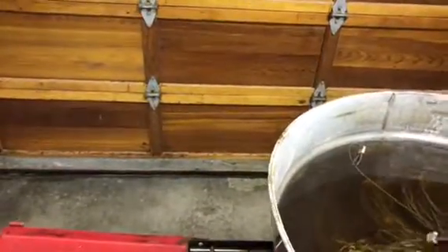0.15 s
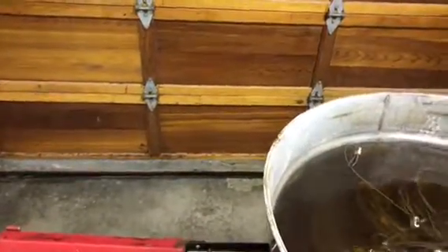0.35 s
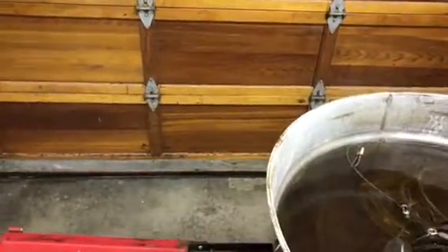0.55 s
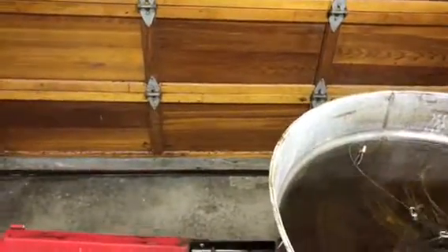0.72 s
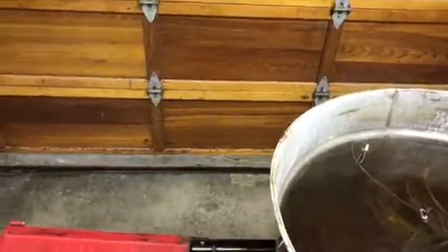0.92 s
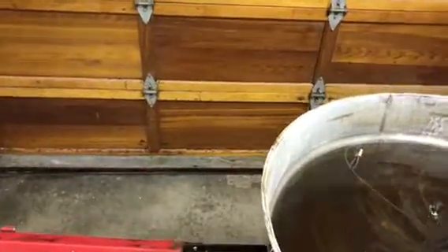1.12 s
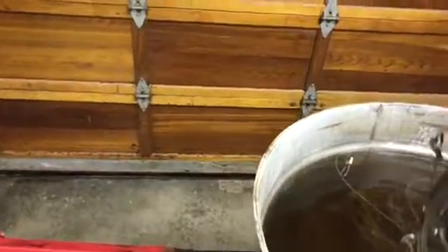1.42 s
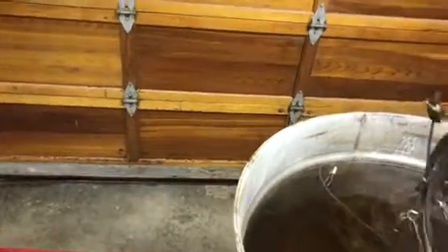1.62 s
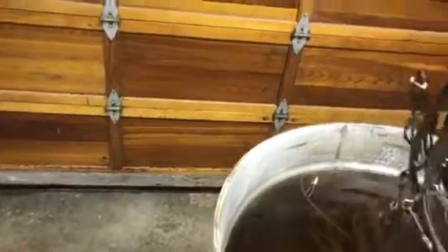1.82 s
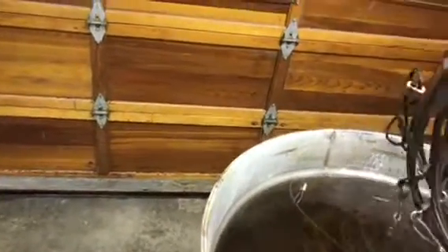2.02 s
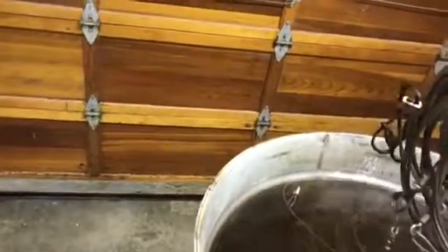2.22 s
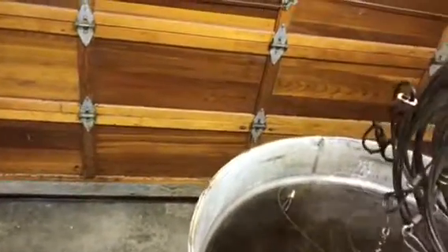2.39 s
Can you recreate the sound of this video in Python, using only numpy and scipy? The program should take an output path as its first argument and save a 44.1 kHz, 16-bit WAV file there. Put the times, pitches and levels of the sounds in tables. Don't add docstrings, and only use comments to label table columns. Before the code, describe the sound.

Wet cable drags against a ringing metal tub, followed by fast dripping, plinks and watery plops

```python
import sys
import numpy as np
from scipy import signal
from scipy.fft import rfft, irfft
from scipy.io import wavfile
from scipy.ndimage import uniform_filter1d

SR = 44100
rng = np.random.default_rng(int(sys.argv[2]) if len(sys.argv) > 2 else 0)


def store_pcm(level_fs):
    pcm = np.round(np.clip(level_fs, -1, 1) * 32767).astype(np.int16)
    wavfile.write(sys.argv[1], SR, np.atleast_2d(pcm).T)


def decibels_to_gain(level_db):
    exponent = np.asarray(level_db, float) / 20
    return 10 ** exponent


N = 112454


def evened(x):
    return x / np.sqrt(np.mean(x ** 2) + 1e-20)


def read(points, hz):
    f, value = np.transpose(points)
    return np.interp(np.log(hz + 1), np.log(f + 1), value)


def add(mix, start_s, sound):
    part = mix[round(start_s * SR):][:len(sound)]
    part += sound[:len(part)]


def colour(x, points):
    hz = np.fft.rfftfreq(len(x), 1 / SR)
    return irfft(rfft(x) * decibels_to_gain(read(points, hz)), len(x))


def resonate(x, hz, width_hz):
    return signal.lfilter(*signal.iirpeak(hz, hz / width_hz, SR), x)


def resonate_twice(x, hz, width_hz):
    return resonate(resonate(x, hz, width_hz), hz, width_hz)


def smooth_noise(size):
    return evened(uniform_filter1d(uniform_filter1d(rng.standard_normal(N), size), size))


def wander(spread_db=5.0, window_s=0.045):
    return decibels_to_gain(spread_db * smooth_noise(round(window_s * SR)))


def clicks(per_s, spread_db):
    when, sign, size = rng.random((3, N))
    return (when < per_s / SR) * np.sign(sign - 0.5) * decibels_to_gain(-spread_db * np.log(size + 1 / 30))


def decay(peak_db, t60_s, t):
    return decibels_to_gain(peak_db - 60 * t / t60_s)


def puff(peak_db, lo_hz, hi_hz, t60_s, noise):
    band = signal.butter(2, [lo_hz, min(hi_hz, 20000)], "band", fs=SR, output="sos")
    fade = decay(peak_db, t60_s, np.arange(len(noise)) / SR)
    return fade * 0.5 * evened(signal.sosfilt(band, noise))


def bubble(peak_db, hz, t60_s, rise_per_s=4.7, neck_rise=0):
    neck_s, onset_s = 0.00075, 0.0004
    t = np.arange(0, 1.2 * t60_s, 1 / SR)
    neck = neck_rise * neck_s * (1 - np.exp(-t / neck_s))
    turns = hz * (t + rise_per_s * t ** 2 / 2 + neck)
    return decay(peak_db, t60_s, t) * np.minimum(t / onset_s, 1) * np.sin(2 * np.pi * turns)


# pitch_hz, level_db (per Hz)
AIR_SPECTRUM = [(76, -56), (130, 7), (501, 0), (780, -0.5), (1240, -23), (1680, -25), (8740, -13.5),
                (16000, -13.5)]


def air():
    return decibels_to_gain(-66) * evened(colour(rng.standard_normal(N), AIR_SPECTRUM))


# pitch_hz, width_hz, level_db
RUMBLES = [(58.3, 10, -71.5), (92.8, 34, -70), (32, 88, -74)]


def rumble():
    out = np.zeros(N)
    for hz, width_hz, level_db in RUMBLES:
        out += decibels_to_gain(level_db) * evened(resonate_twice(rng.standard_normal(N), hz, width_hz))
    return out


# time_s, level_db, brightness_db
DRAGS = [
    [(0, -56, -0.5), (.19, -57, 4), (.25, -44.5, 4), (.34, -42.5, 3.5), (.5, -42, 7), (.6, -45, -4),
     (.67, -51.5, -2), (.76, -58.5, 0), (.92, -72.5, 1)],
    [(1.02, -65.5, -15), (1.034, -50.5, 3.5), (1.09, -57, -4.5), (1.14, -53, 2), (1.2, -50.5, 3.5),
     (1.25, -49.5, -19), (1.31, -45, -11), (1.38, -57, -4), (1.47, -68.5, -12)],
]
# pitch_hz, level_db (per Hz)
WALL_SPECTRUM = [(150, -23), (700, -11.5), (1100, 1), (2100, -2), (3200, -5), (4800, -17), (7000, -20.5),
                 (16000, -25)]
# pitch_hz, width_hz, level_db
TUB_MODES = [(1350, 71, 5.5), (1550, 220, 3), (2280, 390, -9.5), (2720, 350, -0.5), (3526, 65, 2),
             (3590, 34, -7)]
FIZZ_HZ = [5600, 6500, 8000, 9800, 12500, 14800]


def scrape():
    slips_per_s, spread_db, split_hz = 5000, -0.5, 4670
    low_pass = signal.butter(4, split_hz, fs=SR, output="sos")
    high_pass = signal.butter(4, split_hz, "high", fs=SR, output="sos")
    time_s, level_db, bright_db = np.concatenate(DRAGS).T
    t = np.arange(N) / SR
    drag = decibels_to_gain(np.interp(t, time_s, level_db))
    brightness = decibels_to_gain(np.interp(t, time_s, bright_db))

    bare = evened(clicks(slips_per_s, spread_db))
    bumps, rings = knocks(bare)

    slips = colour(clicks(slips_per_s, spread_db), WALL_SPECTRUM)
    low = signal.sosfilt(low_pass, slips)
    high = signal.sosfilt(high_pass, slips)
    fizz = sum(resonate(high * wander(), hz, hz / 8) for hz in FIZZ_HZ)
    high = decibels_to_gain(-3) * (high + fizz)
    wall = low * (drag + bumps) + high * brightness * (drag + decibels_to_gain(7.5) * bumps)

    modes = [decibels_to_gain(db) * resonate(bare * wander(), hz, width_hz) for hz, width_hz, db in TUB_MODES]
    tub = decibels_to_gain(-1.5) * evened(sum(modes)) * (drag + bumps) + rings
    return wall / np.std(low) + signal.sosfilt(low_pass, tub)


def boom():
    lag_s, hz, width_hz = 0.26, 354, 276
    time_s, level_db, _ = np.transpose(DRAGS[0])
    drag = decibels_to_gain(np.interp(np.arange(N) / SR, time_s, level_db))
    keep = np.exp(-1 / (lag_s * SR))
    lagged = signal.lfilter([1 - keep], [1, -keep], drag, zi=[decibels_to_gain(-49.5)])[0]
    return decibels_to_gain(-18.5) * lagged * evened(resonate_twice(rng.standard_normal(N), hz, width_hz))


# time_s, level_db
DRIZZLE_LEVEL = [(0, -64.5), (.8, -77), (1.4, -66), (1.6, -64), (1.88, -74), (2.302, -63.5), (2.55, -68.5)]


def drizzle():
    per_s, spread_db, tilt_db_per_octave, pitches = 450, 4.2, -1.5, 24
    train, kind = clicks(per_s, spread_db), rng.integers(0, pitches, N)
    out = np.zeros(N)
    for k, hz in enumerate(np.geomspace(1700, 14000, num=pitches)):
        t60_s = rng.uniform(8, 28) / hz
        drop = bubble(tilt_db_per_octave * np.log2(hz / 4000), hz, t60_s, 67.0)
        out += signal.oaconvolve(train * (kind == k), drop)[:N]
    time_s, level_db = np.transpose(DRIZZLE_LEVEL)
    return evened(out) * decibels_to_gain(np.interp(np.arange(N) / SR, time_s, level_db))


# start_s, peak_db, t60_s, pitch_hz
COIL_KNOCKS = [(0.082, -40.5, 0.054, 2580), (0.251, -33, 0.21, 1745), (0.2754, -32, 0.075, 1350),
               (0.276, -26.5, 0.066, 1800), (0.561, -23.5, 0.057, 1380), (0.3803, -24, 0.089, 1550),
               (0.53, -36, 0.53, 2720), (0.558, -24.5, 0.055, 2760), (1.0285, -41, 0.11, 1600),
               (1.058, -40, 0.16, 1410), (1.072, -35, 0.084, 1595), (1.2508, -35, 0.24, 1640),
               (1.276, -31.5, 0.08, 1540), (1.289, -32.5, 0.055, 2800)]


def knocks(bare):
    rise_s, ring_width_hz = 0.009, 114
    bumps, rings = np.zeros(N), np.zeros(N)
    for start_s, peak_db, t60_s, hz in COIL_KNOCKS:
        t = np.arange(0, t60_s, 1 / SR)
        shape = np.minimum(t / rise_s, 1) * decay(peak_db, t60_s, t)
        ring = evened(resonate(bare[round(start_s * SR):][:len(t)], hz, ring_width_hz))
        add(bumps, start_s - rise_s / 2, decibels_to_gain(-12.5) * shape)
        add(rings, start_s - rise_s / 2, decibels_to_gain(-2) * shape * ring)
    return bumps, rings


# start_s, peak_db, centre_hz
DROP_TICKS = [(0.179, -39.5, 7500), (0.6885, -37, 6130), (0.8404, -58.5, 9200), (0.856, -41.5, 6760),
              (0.8779, -40, 4860), (0.9037, -48, 8900), (0.948, -48, 9400), (0.9908, -45.5, 5950),
              (1.0131, -39.5, 7250), (1.274, -36.5, 7000), (1.3455, -37, 4260), (1.4722, -41.5, 5900),
              (1.5308, -40.5, 7900), (1.606, -45.5, 5170), (1.615, -51, 7040), (1.7152, -38, 7000),
              (1.724, -38.5, 7340), (1.7662, -43, 7900), (1.7672, -33, 7040), (1.773, -36, 6240),
              (1.777, -38, 5820), (1.8058, -32, 5800), (1.9007, -53, 7000), (1.917, -52, 6950),
              (1.958, -42, 5000), (1.9597, -31.5, 8200), (1.9967, -48, 6240), (2.0088, -39, 5850),
              (2.018, -44, 6200), (2.0388, -35.5, 5130), (2.0609, -42, 8330), (2.073, -34, 6900),
              (2.0748, -32.5, 7040), (2.082, -42, 6500), (2.1291, -36.5, 5550), (2.2028, -37.5, 5300),
              (2.2087, -51, 6500), (2.2163, -50, 4600), (2.2477, -46, 7000), (2.2623, -33, 5300),
              (2.2998, -46, 5300), (2.3114, -42, 4500), (2.3568, -41.5, 5000), (2.3992, -44.5, 9700),
              (2.403, -42, 4960), (2.4258, -38.5, 5030), (2.447, -43.5, 5970), (2.4546, -42, 8550),
              (2.4595, -45.5, 10100), (2.4655, -55, 8540), (2.4879, -46, 5870), (2.5, -39.5, 6480)]


def ticks():
    out = np.zeros(N)
    for start_s, peak_db, hz in DROP_TICKS:
        noise = rng.standard_normal(400)
        sharp_db = peak_db + 0.6 * (peak_db + 33)
        add(out, start_s, puff(peak_db + 0.5, 0.76 * hz, 1.2 * hz, 0.012, noise))
        add(out, start_s, puff(sharp_db - 6.5, 2200, 16000, 0.0025, noise))
        add(out, start_s, decibels_to_gain(sharp_db + 7) * np.array([-1., 2, -1]))
    return out


SNAP_T60_S = 0.0095
# start_s, peak_db, pitch_hz, t60_s
SMALL_BUBBLES = [(0.1803, -41, 3330, 0.0094), (0.831, -45.5, 4400, 0.015), (1.036, -48, 3970, 0.01),
                 (1.472, -51, 2750, 0.008), (1.493, -51, 4220, 0.01), (1.662, -47, 3800, 0.01),
                 (1.5167, -45, 4330, 0.016), (1.5349, -38, 2360, 0.0035), (1.6063, -49.5, 4300, 0.0082),
                 (1.615, -46, 3730, 0.017), (1.6979, -41.5, 2930, 0.018), (1.72, -36.5, 2340, 0.0091),
                 (1.768, -32, 2820, 0.0026), (1.8067, -35.5, 2600, 0.0098), (1.9594, -28, 3040, 0.004),
                 (2.022, -38.5, 2580, 0.0077), (2.0386, -30, 3590, 0.0096), (2.073, -35, 3030, 0.014),
                 (2.129, -34, 3760, 0.0093), (2.2356, -42, 3970, 0.01), (2.2486, -44, 2770, 0.015),
                 (2.2619, -31.5, 3160, 0.019), (2.3101, -34, 3290, 0.014), (2.356, -31.5, 2200, 0.0067),
                 (2.3705, -42.5, 2890, 0.03), (2.4254, -42, 3080, 0.018), (2.447, -43, 3720, 0.011),
                 (2.51, -47, 3950, 0.02), (2.5414, -46, 4170, 0.0062)]


def plinks():
    tones, snaps = np.zeros(N), np.zeros(N)
    for start_s, peak_db, hz, t60_s in SMALL_BUBBLES:
        add(tones, start_s, bubble(peak_db, hz, t60_s))
        snap = puff(peak_db - 0.5, 1.1 * hz, 1.51 * hz, SNAP_T60_S, rng.standard_normal(500))
        add(snaps, start_s, snap)
    return tones, snaps


# start_s, peak_db, pitch_hz, t60_s
FLOOR_THUMPS = [
    (.5, -43.5, 93, 0.17),
    (1.319, -52.5, 59.7, 0.3),
    (2.13, -64, 55.5, .2),
]


def thumps():
    out = np.zeros(N)
    for start_s, peak_db, hz, t60_s in FLOOR_THUMPS:
        t = np.arange(0, t60_s, 1 / SR)
        add(out, start_s, decay(peak_db, t60_s, t) * np.minimum(t / 0.02, 1) * np.sin(2 * np.pi * hz * t))
    return out


# start_s, peak_db
SPRAY_BURSTS = [(0.725, -28), (1.0121, -37.5), (1.101, -31), (1.6299, -34), (1.6965, -34), (1.9442, -36),
                (1.989, -42), (2.0093, -55), (2.073, -49), (2.1011, -25), (2.139, -53), (2.1888, -36),
                (2.2274, -35.5), (2.5414, -32)]


def spray():
    out = np.zeros(N)
    for start_s, peak_db in SPRAY_BURSTS:
        noise = np.gradient(rng.standard_normal(300))
        add(out, start_s, puff(peak_db - 0.5, 10600, 20000, 0.0054, noise))
    return out


# start_s, peak_db, pitch_hz, t60_s, rise_per_s
LARGE_BUBBLES = [(.736, -36.5, 1830, 0.034, 19), (1.648, -42.5, 1770, 0.011, 6.9),
                 (1.696, -50, 1400, 0.018, 1.5), (1.723, -39.5, 770, 0.029, 1.3),
                 (1.769, -44.5, 1035, 0.054, 14.6), (1.786, -48, 1524, 0.03, 1),
                 (1.807, -48.5, 1124, 0.089, 2.5), (1.8411, -33, 795, 0.042, 0.43),
                 (1.951, -40.5, 1300, 0.044, 1.7), (2.084, -42, 1153, 0.065, 5.6),
                 (2.113, -51, 848, 0.084, 0.7), (2.13, -34.5, 1420, 0.03, 0.3),
                 (2.281, -46.5, 1204, 0.027, 1.7), (2.2413, -43, 1880, 0.015, 1.5),
                 (1.991, -44, 1830, 0.012, 1.5), (2.434, -38, 1310, 0.022, 1.5),
                 (2.366, -49, 2500, 0.02, 23)]


def plops():
    tones, snaps = np.zeros(N), np.zeros(N)
    for start_s, peak_db, hz, t60_s, rise_per_s in LARGE_BUBBLES:
        add(tones, start_s, bubble(peak_db, hz, t60_s, rise_per_s, neck_rise=0.48))
        snap = puff(peak_db + 1.5, 1.0 * hz, 2.8 * hz, SNAP_T60_S, rng.standard_normal(500))
        add(snaps, start_s, snap)
    return tones, snaps


# start_s, peak_db, pitch_hz,
# t60_s
MURKY_RINGS = [(1.843, -39.5, 1325, 0.028), (2.04, -48, 3490, 0.047), (2.132, -51, 1150, .08),
               (2.136, -50.5, 1386, 0.11), (2.272, -46.5, 1985, 0.16), (2.273, -54, 3160, 0.091),
               (2.312, -49, 3380, 0.066), (2.373, -53, 2980, 0.065), (2.492, -57.5, 3520, 0.071),
               (.97, -59.5, 1180, 0.23), (2.462, -53, 2670, 0.074)]


def tails():
    out = np.zeros(N)
    for start_s, peak_db, hz, t60_s in MURKY_RINGS:
        murk = evened(resonate_twice(rng.standard_normal(6000), hz, 220))[1000:]
        add(out, start_s, decay(peak_db, t60_s, np.arange(len(murk)) / SR) * murk)
    return out


def swish():
    centre_s, half_s, hz, width_hz = 1.16, 0.04, 13800, 3000
    swell = np.exp(-((np.arange(N) / SR - centre_s) / half_s) ** 2)
    return decibels_to_gain(-59.5) * swell * evened(resonate_twice(rng.standard_normal(N), hz, width_hz))


# start_s, level_db, pitch_hz, length_s, rise_octaves
BURSTING_BUBBLES = [
    (1.773, -45.5, 1322, 0.0117, 0.61),
    (2.2614, -36, 1765, .0095, 0.37),
    (2.392, -53.5, 1375, 0.0088, 1.47),
    (2.443, -50, 1213, .017, 1.3),
]


def swoops():
    out = np.zeros(N)
    for start_s, level_db, hz, length_s, octaves in BURSTING_BUBBLES:
        u = np.arange(0, length_s, 1 / SR) / length_s
        turns = np.cumsum(hz * 2 ** (octaves * u ** 4.5)) / SR
        add(out, start_s, decibels_to_gain(level_db) * np.sqrt(np.sin(np.pi * u)) * np.sin(2 * np.pi * turns))
    return out


def drips():
    small, small_snaps = plinks()
    large, large_snaps = plops()
    wobble = decibels_to_gain(2.5 * smooth_noise(90))
    splashes = ticks() + small_snaps + spray() + large_snaps + tails()
    return splashes + (small + large + swoops()) * wobble


# pitch_hz, t60_s
GARAGE_T60 = [(300, 1), (750, 0.3), (1500, 0.11), (4000, 0.21), (12000, 0.29)]


def garage(x):
    hz, t, z = signal.stft(rng.standard_normal(SR // 2), SR, nperseg=256)
    fade = decibels_to_gain(-60 * t / read(GARAGE_T60, hz)[:, None])
    tail = signal.istft(z * fade, SR, nperseg=256)[1]
    tail = tail * np.minimum(np.arange(len(tail)) / (0.002 * SR), 1)
    tail = tail / np.linalg.norm(tail)
    echo = decibels_to_gain(-38) * np.array([1.])
    add(tail, 0.0012, echo)
    add(tail, 0.0027, -echo)
    return signal.fftconvolve(x, tail)[:N]


def scene():
    hum = air() + rumble() + thumps()
    cable = scrape() + boom() + swish()
    water = drizzle() + drips()
    wet = decibels_to_gain(-4) * garage(cable) + decibels_to_gain(-8.5) * garage(water)
    return (cable + water + wet + hum)[None]


def top_cut(x):
    return signal.sosfilt(signal.butter(12, 16850, fs=SR, output="sos"), x)


# pitch_hz, gain_db
MIC_RESPONSE = [(8500, -3), (10500, -5.5), (12000, -3.5), (15700, -6), (16000, -30), (16900, -66)]


def record(dry):
    mix = colour(dry[0], MIC_RESPONSE)[None]
    return top_cut(mix)


dry = scene()
out = record(dry)
store_pcm(out)
```